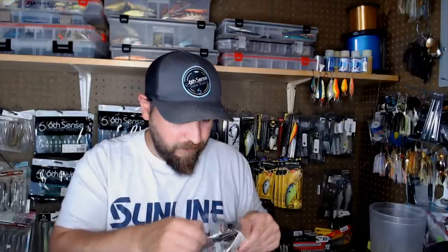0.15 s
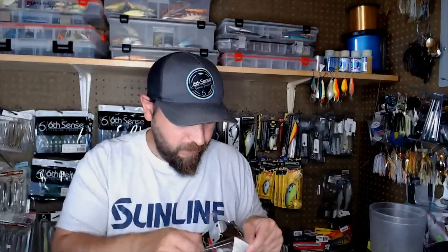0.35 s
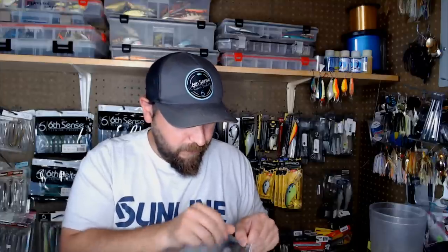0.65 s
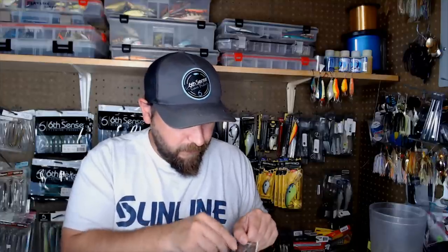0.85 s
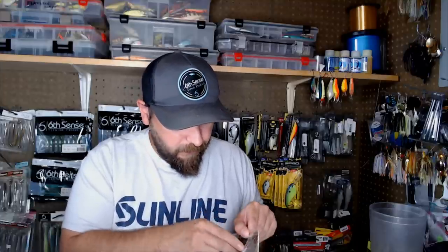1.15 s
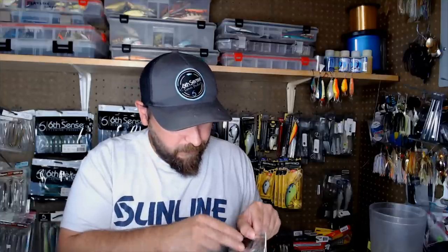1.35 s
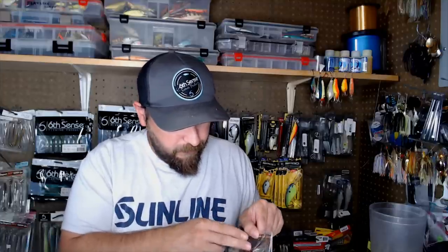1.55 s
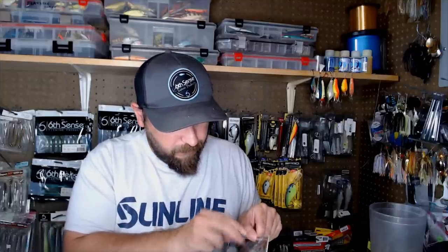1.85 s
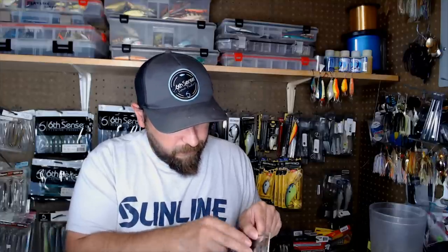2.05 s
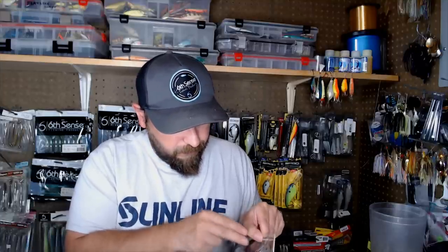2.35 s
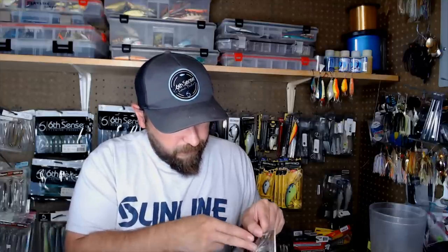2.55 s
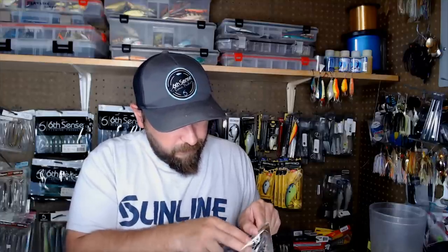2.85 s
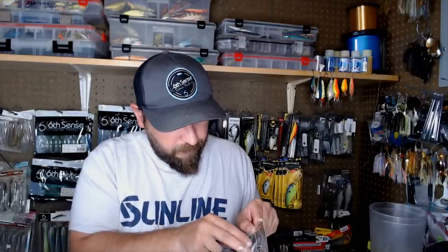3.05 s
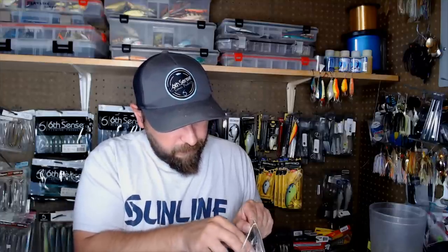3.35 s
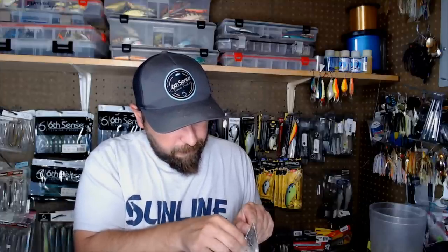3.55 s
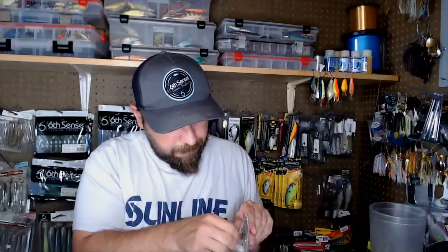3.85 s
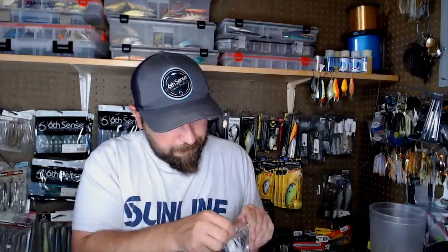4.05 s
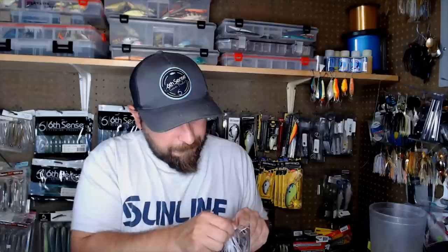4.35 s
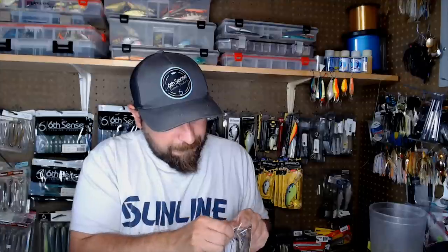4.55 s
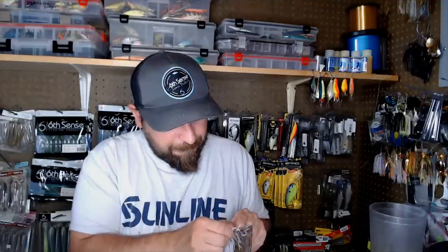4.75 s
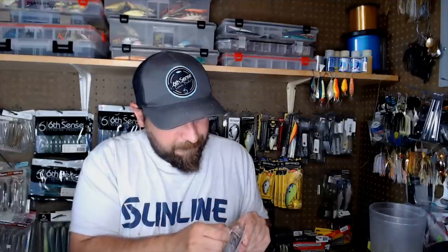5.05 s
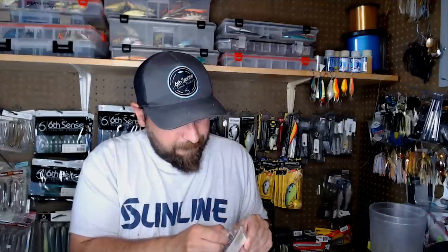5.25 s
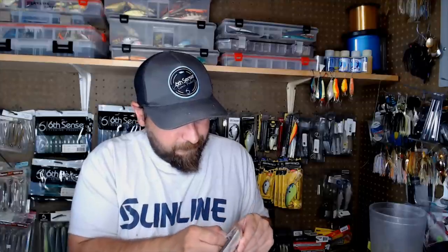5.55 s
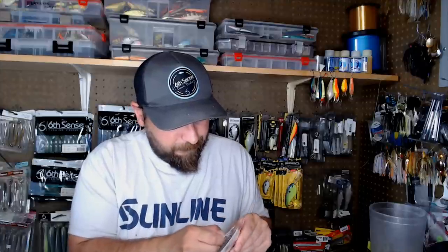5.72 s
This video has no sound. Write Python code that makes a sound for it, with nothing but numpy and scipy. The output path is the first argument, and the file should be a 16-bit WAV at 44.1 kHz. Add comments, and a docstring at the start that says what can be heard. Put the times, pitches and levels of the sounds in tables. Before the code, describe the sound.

Close, dry sound of hands opening a stiff plastic pack at a desk. A dense burst of crisp snaps and rustle comes first, then sparse small clicks, a few livelier clusters, and the loudest crack with a low thump and hollow knock at about 4.4 seconds. Smaller snaps follow and thin out. Small cluttered room, short reflections, faint distant fan.

```python
"""Creases of a stiff clear plastic pack snap through as hands pry it open: bursts of noise, with a ringing panel.
The sheet rustles, mostly under the fingers, as swelling crackle and hiss; metal parts inside scrape as driven modes.
The pack thumps low (damped sines) and knocks hollowly (struck modes); a few faint squeaks glide down.
Echoes of a small cluttered room and a desk top follow as decaying noise; forearms bump the desk as low rumble.
Far off, a fan gives coloured noise and a wavering hum."""
import sys
import numpy as np
from scipy import signal
from scipy.fft import rfft, irfft, next_fast_len
from scipy.io import wavfile

SR = 44100
rng = np.random.default_rng(int(sys.argv[2]) if len(sys.argv) > 2 else 0)


def master_out(mix):
    """Clip the mix to full scale and print it as 16-bit PCM to the path in sys.argv[1]."""
    frames = np.transpose(np.atleast_2d(mix))
    ceiling = np.clip(frames, -1, 1)
    pcm = np.round(ceiling * 32767).astype(np.int16)
    wavfile.write(sys.argv[1], SR, pcm)


N = 259341  # length in samples

# Creases snapping; levels hold before the sheet colours them, crack_db is energy over 1 ms:
# start_s, crack_db, sizzle_above_crack_db, panel_above_crack_db, panel_hz, length_ms
CREASE_SNAPS = [(0.0222, -37, 2, 2.5, 1110.0, 2.7), (0.0515, -37.5, 5.0, 0, 800, 2.4),
                (0.0778, -42.5, 13.5, 4.5, 890.0, 1.9), (0.0839, -33.5, 5.5, -0.5, 885, 2.7),
                (0.1126, -44.5, -3.0, -0.5, 825, 1.8), (0.147, -57, -18, 4, 1430, 4.2),
                (0.195, -38.0, 4.5, 5, 1660, 2.2), (0.218, -45.5, 5, 4.5, 1300, 3.5),
                (0.355, -63.5, 5.5, -2, 1080.0, 1.7), (0.4455, -49.5, -5, 3, 1690, 5.3),
                (0.463, -65, 9, 8.0, 1560, 2.2), (0.4789, -39, 8, -2, 1200, 1.45),
                (0.5148, -46.0, 7, -1, 1820.0, 2.9), (0.5526, -49, -4, -2.0, 1520.0, 6.9),
                (0.5612, -56, 12, -14, 1520.0, 0.47), (0.5678, -50.5, 7, -4, 1260.0, 0.6),
                (0.5729, -48, 2, -11, 1170.0, 1), (0.59, -47.5, 4, 3.0, 1280, 3.5),
                (0.704, -59.5, 13.5, -3.5, 1180.0, 3.3), (0.8023, -57.5, 1, 11.0, 1060.0, 6.3),
                (1.0186, -60.5, 1.5, -5, 1460.0, 3.2), (1.0346, -56.5, 3.5, -7, 1300.0, 3.7),
                (1.056, -57.5, -11, -1.0, 1520, 1.7), (1.1888, -48.5, 6, 6.0, 1100, 8.5),
                (1.4, -50, 1.5, -9, 990, 3.1), (1.423, -55, 8, -15, 1460.0, 1.5),
                (1.4565, -55.0, -8, -5.5, 940.0, 3.5), (1.4662, -51.5, 12.5, -25, 1530.0, 1.9),
                (1.6384, -43.5, 8.5, -6.5, 1760, 1.9), (1.678, -43.0, 0.5, -10.5, 1250, 4.6),
                (1.6964, -53, -2, -5, 1550.0, 1.9), (1.714, -52, 0, -15, 1230.0, 3.1),
                (1.7372, -49.5, 1.0, -5.5, 1220.0, 2.1), (1.7558, -44, 4.5, -12.5, 1620.0, 0.92),
                (1.7688, -52.0, 6, -7.5, 830, 1.8), (1.7878, -41, 2.5, -10, 1530, 5.2),
                (1.9748, -51.5, -2.0, -13.0, 1370, 2.2), (1.9891, -57.5, 7, -3.0, 1300, 1.5),
                (1.994, -59, -10, 6, 850, 4.4), (2.0624, -58.5, 0, -3.5, 940.0, 6.3),
                (2.0862, -59.5, 1.5, -5.0, 1100, 5), (2.2284, -64.5, 1, 11.0, 920, 7.5),
                (2.345, -54.0, 1, 1, 1400, 1.8), (2.4053, -59.5, -3, 7.5, 1210, 6.1),
                (2.459, -42, -3, -3.5, 1120, 3.4), (2.4645, -47.0, 5.5, 2, 650, 2.6),
                (2.4782, -44, 0, 4, 1900, 3), (2.487, -41.5, -7, -4.5, 1900, 8.2),
                (2.5655, -57, 2, -3.0, 1420.0, 4.2), (2.5771, -51, 4, -1.5, 1340.0, 7.3),
                (2.6365, -48, -1, -1.5, 1770, 0.67), (2.6573, -54, 6, -12, 484, 4.7),
                (2.6958, -58, 4, -10, 1410.0, 1.1), (2.7076, -62, 12.5, -12, 1320.0, 3.0),
                (2.727, -49, 1.5, 0, 1750, 1.1), (2.7684, -58, 5, 5, 1700, 1.9),
                (2.8035, -61, 7, 5.5, 1000, 4.5), (2.825, -49.5, 7.5, -9, 1450.0, 7.9),
                (2.9011, -61.0, 2, 5, 930, 4.1), (2.9118, -47.5, 3.0, 1.5, 1710, 1.6),
                (2.9402, -74, 17.5, 5, 1140, 1.6), (2.9817, -71, 17.5, -11, 1040.0, 3.5),
                (3.0305, -57.5, 9.5, 0, 1340.0, 2.9), (3.0798, -59.5, -11, 12.5, 1680, 4.1),
                (3.11, -55.5, 15.5, -1, 1230.0, 2.5), (3.1987, -61, 7, 1, 1310, 4.4),
                (3.2667, -64, 13.5, -4, 1210.0, 0.7), (3.337, -58.0, 2.0, 0, 1570.0, 1.8),
                (3.3912, -61, 12.5, -11, 1070.0, 0.8), (3.417, -37, 11, -11, 1510.0, 1.2),
                (3.4466, -31.5, 6, -3.5, 1760, 1.1), (3.483, -49.0, 5.0, 1, 1050, 4.4),
                (3.4937, -61.0, 21, 3, 407, 4), (3.5121, -50.5, 9, -2, 1400, 4.3),
                (3.5293, -38.5, 4.5, -4, 1750, 1.4), (3.5419, -45, -3, 5.5, 1560, 5.6),
                (3.6274, -59, 3.0, 3, 1150, 3.3), (3.654, -59, 2, 6.5, 1510, 1.4),
                (3.6732, -55, -3, -9, 1230, 1.6), (3.6964, -63, 7, -5, 1330.0, 0.85),
                (3.7078, -54, -2, -2, 830, 2.8), (3.7444, -49.5, 2.5, -4, 1750, 2),
                (3.8026, -46, 5, 8, 1470, 3.4), (3.8222, -49, 9, 1, 1960.0, 1.7),
                (3.8412, -35, 10.5, 6, 1700, 1.3), (3.933, -49.5, 2.5, -5, 1400, 5.6),
                (3.9608, -47, -2, 0, 1330.0, 1.9), (3.9935, -47, 14, 3, 1430, 3),
                (4.0063, -50.5, 7, 5, 1300, 3.6), (4.1227, -54, 5.5, 4, 1850, 0.39),
                (4.1882, -66, 1, 12, 1400, 12), (4.306, -66.5, 13, -1.0, 1060.0, 0.68),
                (4.3446, -46, 4, -7.5, 1060, 2), (4.3804, -42.5, 8.5, -4, 1480.0, 3.2),
                (4.394, -47, 5.0, 13, 1320.0, 3.7), (4.408, -25, 3, 5.5, 1030, 5),
                (4.4522, -35.5, 6.5, -6.5, 846, 5.2), (4.5087, -37.5, 8.5, -12, 1260, 2),
                (4.7166, -49.5, -7, 8.5, 1880, 2.4), (4.7979, -35.0, -5, -0.5, 1270, 2.2),
                (4.8337, -48, 5, 4, 1580.0, 11), (4.8455, -49.5, 12.0, -4, 895, 1.7),
                (4.8763, -56.0, 2, 5.5, 700, 3.2), (4.9103, -63, 7.5, -4, 880.0, 4.6),
                (4.9374, -65, 8.0, 5, 366, 1.7), (4.9453, -54, 6, -8, 357, 15),
                (4.9847, -48.5, 9.5, 4.5, 1560, 1.5), (5.0326, -56, 12.5, 2, 1260, 2),
                (5.0702, -47.5, 7, 8, 1450, 2.9), (5.2832, -34, 0.5, -5.0, 1440, 3.9),
                (5.3289, -39.5, 4.5, -1, 1550, 4.1), (5.3586, -62, 1, -4.0, 1370.0, 7.1),
                (5.4224, -61, 11, -3, 1070.0, 4.6), (5.4717, -63, 20, -1.5, 1000.0, 9.3),
                (5.5605, -56.5, 14, -4, 1260, 3), (5.5967, -66.5, 13, 0.0, 840.0, 5.7),
                (5.6748, -52.5, 6, 4, 1250, 3.5), (5.7117, -63, 10, 10.5, 1560, 8.1),
                (5.728, -56.5, 2, 0, 720, 4.5), (5.7603, -60.5, 2, 4.5, 900, 2.6),
                (5.7752, -64, 1.0, 2, 1190.0, 3.1)]
PANEL_T60_CYCLES = 4.6
# the pack's body against its panel, at a panel pitch of 1 kHz; never louder than the panel
BODY_DB, BODY_DB_PER_OCTAVE = -4.5, -11


def snaps(rise_ms=0.047, fade_exponent=1.03, onset_boost_ms=2.9, onset_fade_ms=0.3):
    """Buckling: a crease lets go as a burst of micro-cracks, and each part of the sheet answers at its own level."""
    start_s, crack_db, sizzle_db, panel_db, panel_hz, length_ms = np.vstack([CREASE_SNAPS, ticks()]).T
    octaves = np.log2(panel_hz / 1000)
    body_db = panel_db + np.minimum(BODY_DB + BODY_DB_PER_OCTAVE * octaves, 0)

    t_ms = np.arange(1536) / SR * 1000
    rise = 1 - np.exp(-t_ms / rise_ms)
    fade = np.exp(-(t_ms / np.clip(length_ms, 0.2, 15)[:, None]) ** fade_exponent)
    # short snaps start hardest
    onset = 1 + onset_boost_ms / length_ms[:, None] * np.exp(-t_ms / onset_fade_ms)
    envelope = rise * fade * onset + 1e-12
    micro_cracks = envelope * rng.standard_normal((len(start_s), len(t_ms)))

    crack = band(micro_cracks, 2350, 5260)
    sizzle = band(band(micro_cracks, 5500, 14800), 5900, 16000)
    panel = np.array([ring(band(burst, 0.42 * hz, 3.1 * hz), hz, PANEL_T60_CYCLES / hz)
                      for burst, hz in zip(micro_cracks, panel_hz)])
    body = band(micro_cracks, 210, 800)

    bursts = 0
    for part, above_db in [(crack, 0), (sizzle, sizzle_db), (panel, panel_db), (body, body_db)]:
        energy = np.sum(part ** 2, axis=1) / SR * 1000
        gain = from_db(crack_db + above_db) / np.sqrt(energy)
        bursts = bursts + part * gain[:, None]

    out = np.zeros(N + len(t_ms))
    first_sample = (start_s * SR).astype(int)
    np.add.at(out, first_sample[:, None] + np.arange(len(t_ms)), bursts)
    return out[:N]


TICKS_PER_S = 8
TICK_DB, TICK_SPREAD_DB, TICK_MS = -67, 5.5, 2.3  # mean and spread of crack level, median length


def ticks():
    """Random release: faint creases let go at chance times, as rows with the columns of the snaps."""
    count = int(TICKS_PER_S * N / SR)
    uniform, normal = rng.random((count, 2)), rng.standard_normal((count, 4))
    start_s = uniform[:, 0] * N / SR
    crack_db = TICK_DB + TICK_SPREAD_DB * normal[:, 0]
    sizzle_db = 2.5 + 6.0 * normal[:, 1]
    panel_db = -5 + 6.0 * normal[:, 2]
    panel_hz = 800 * 2.5 ** uniform[:, 1]
    length_ms = TICK_MS * from_db(4.0 * normal[:, 3])
    return np.c_[start_s, crack_db, sizzle_db, panel_db, panel_hz, length_ms]


# The sheet rustling: finger strokes, and one short burst of crackle (at 3.415 s) just before a snap.
# Levels hold before the sheet colours them; swell and fade are times for 20 dB:
# peak_s, crisp_rustle_db, dull_rustle_above_crisp_db, swell_ms, fade_ms
RUSTLE_SWELLS = [(0.0, -45.5, -7.5, 50, 168), (0.09, -56, 3, 100, 56), (0.219, -55, -1.5, 20, 54),
                 (0.485, -55.5, -7, 74, 141), (0.57, -58, -0.5, 53, 48), (0.702, -70.5, -8, 118, 90),
                 (0.814, -67.5, 6, 33, 51), (1.13, -71.5, -17, 350, 64), (1.198, -56.5, 2, 26, 41),
                 (1.471, -61, -9.5, 211, 51), (1.648, -59, -12, 34, 144), (1.799, -57.5, -6, 107, 25),
                 (1.985, -67.5, -18, 98, 270), (2.236, -75, 8, 20, 30), (2.487, -59.5, -14, 125, 33),
                 (2.578, -65, -4, 59, 598), (2.832, -65, 2, 55, 32), (3.116, -69, -9, 120, 503),
                 (3.415, -55, -7, 5, 10), (3.488, -58, -2, 115, 126), (3.808, -63, 7, 25, 33),
                 (3.85, -57.5, -17, 98, 54), (3.942, -50.5, -1.5, 25, 78), (3.997, -50, -2.5, 45, 41),
                 (4.208, -54, -2.5, 59, 35), (4.346, -55.5, -3.5, 47, 37), (4.412, -41, -3.5, 22, 54),
                 (4.512, -51.5, -14, 16, 23), (4.801, -47.5, -5.5, 2, 26), (4.916, -72.5, -0.5, 394, 73),
                 (5.079, -67.5, -4, 303, 74), (5.291, -50.5, -2, 22, 108), (5.326, -49.5, -2.5, 50, 63),
                 (5.44, -59.5, -4, 62, 88), (5.606, -62.5, -8, 48, 61), (5.724, -68, -6.5, 70, 253)]
# Spectrum of the crisp rustle, relative levels: frequency_hz, level_db (per Hz)
CRISP_SPECTRUM = [(1500, -38), (2200, -2), (4300, -5), (8000, -7), (12000, -5), (17000, -2.5)]
# Frequency ranges of the tiny crackles: low_hz, high_hz
CRACKLE_RANGES = [(300, 2500), (1200, 5000), (2500, 8000), (4000, 12000), (6000, 18000), (2000, 18000)]


def rustle():
    """Granular noise: tiny crackles in several frequency ranges mix with hiss, and swell and fade together."""
    peak_s, crisp_db, dull_db, swell_ms, fade_ms = np.transpose(RUSTLE_SWELLS)
    crackles = 0
    for low_hz, high_hz in CRACKLE_RANGES:
        crackles = crackles + band(grains(300, 5.0), low_hz, high_hz) / np.sqrt(high_hz - low_hz)
    crackles = rms_one(shaped(crackles, [(300, -2.5), (16000, 6)]))
    hiss = 1.16 * rng.standard_normal(N)
    texture = (crackles + hiss) * from_db(2.0 * drift(60))
    crisp = rms_one(shaped(texture, CRISP_SPECTRUM)) * swells(peak_s, crisp_db, swell_ms, fade_ms)
    dull = rms_one(band(texture, 370, 2090)) * swells(peak_s, crisp_db + dull_db, swell_ms, fade_ms)
    return crisp + dull


# Colour the plastic gives to snaps and rustle: frequency_hz, gain_db
SHEET_RESPONSE = [(1500, -2), (3000, 0.5), (4300, 2.5), (5300, 0.5), (6700, 4), (9000, 2), (11000, -6),
                  (13000, -6.5), (15500, -6)]


def sheet_colour(x):
    """Linear filtering: the sheet radiates some frequencies more strongly than others."""
    return shaped(x, SHEET_RESPONSE)


# Metal parts scraping: start_s, length_ms, level_db
METAL_SCRAPES = [(0.001, 14, -63.5), (0.037, 67, -62.5), (0.41, 35, -89), (0.696, 10, -74.5),
                 (1.158, 8.5, -79.5), (2.657, 13, -76), (2.821, 20.5, -73.5), (3.475, 32, -67.5),
                 (5.357, 20, -72), (5.425, 24, -69.5), (5.469, 27, -73.5), (5.6, 14.7, -71.5),
                 (5.712, 18, -93)]
# Modes of the metal parts, levels relative to the scrape: pitch_hz, level_db, t60_s
METAL_MODES = [(4115, 3, 0.029), (5890, 5.5, 0.022), (8050, 10.5, 0.026), (8900, -22, 0.0086),
               (10580, 3.5, 0.019), (12170, 2.5, .018), (14000, 5, .018), (15400, 7, .016)]


def scrapes(end_exponent=14.0, uneven_db=1.5):
    """Slip-driven resonance: dense slips drive the short modes of the metal parts, with changing grip on each."""
    t, push = np.arange(N) / SR, np.zeros(N)
    for start_s, length_ms, level_db in METAL_SCRAPES:
        progress = (t - start_s) * 1000 / length_ms
        hold = (progress > 0) * np.exp(-np.clip(progress, 0, 5) ** end_exponent)  # steady, then a quick end
        push += from_db(level_db) * hold
    out = 0
    for hz, level_db, t60_s in METAL_MODES:
        slips = rms_one(grains(3900, 4.4)) * from_db(uneven_db * drift(65))
        steady_level = np.std(ring(slips, hz, t60_s))
        out = out + from_db(level_db) * ring(slips * push, hz, t60_s) / steady_level
    return out


# The whole pack thumping low; envelope_db is the swing's envelope at its start: start_s, envelope_db, pitch_hz
PACK_THUMPS = [(0.022, -48, 350), (0.0839, -47, 400), (0.4787, -53, 133), (1.677, -60, 252),
               (1.994, -56, 330), (2.459, -41.5, 400), (3.483, -50, 450), (3.71, -61, 473),
               (4.408, -24, 402), (4.407, -52, 120), (4.8765, -52.5, 417), (4.9374, -55.5, 193),
               (5.2832, -48.5, 420), (5.728, -58, 334)]
THUMP_T60_CYCLES = 10.2


def thumps():
    """Damped oscillation: one soft push sets a low swing going, which dies away exponentially."""
    out = np.zeros(N)
    t = np.arange(SR // 8) / SR
    for start_s, envelope_db, hz in PACK_THUMPS:
        envelope = from_db(envelope_db - 60 * t * hz / THUMP_T60_CYCLES)
        first = int(start_s * SR)
        out[first:first + len(t)] += envelope * np.sin(2 * np.pi * hz * t)
    return out


# The pack knocking on something hollow; levels before chance and the final band: start_s, level_db
HOLLOW_KNOCKS = [(0.802, -53), (0.819, -53.5), (1.188, -43), (1.199, -45), (1.204, -60), (2.226, -50.5),
                 (4.408, -31)]
# Modes of the hollow body, levels relative to the knock: pitch_hz, level_db, t60_s
HOLLOW_MODES = [(863, -8.5, 0.052), (987, -11.5, 0.14), (1100, -18.5, 0.058), (1305, -15.5, 0.16),
                (1434, -8.5, 0.075), (2390, -15, 0.078)]


def knocks(uneven_db=4.5):
    """Modal excitation: each knock strikes every hollow mode with a strength and sign of its own."""
    start_s, knock_db = np.transpose(HOLLOW_KNOCKS)
    strength = rng.standard_normal((len(start_s), len(HOLLOW_MODES)))
    sign = np.sign(rng.standard_normal((len(start_s), len(HOLLOW_MODES))))
    out = 0
    for mode, (hz, level_db, t60_s) in enumerate(HOLLOW_MODES):
        clicks = np.zeros(N)
        strike_db = knock_db + level_db + uneven_db * strength[:, mode]
        clicks[(start_s * SR).astype(int)] = from_db(strike_db) * sign[:, mode]
        out = out + ring(clicks, hz, t60_s)
    return band(out, 540, 3900)


# Faint thin squeaks, peak levels: start_s, length_s, start_pitch_hz, end_pitch_hz, level_db
FALLING_SQUEAKS = [(0.61, .085, 15250, 14450, -87), (0.715, .095, 14300, 12700, -90),
                   (0.77, .065, 15550, 14500, -87), (0.83, .04, 12400, 11400, -89)]


def squeaks():
    """Frequency glide: near-pure tones fall in pitch and swell in the middle."""
    t, out = np.arange(N) / SR, 0
    for start_s, length_s, start_hz, end_hz, level_db in FALLING_SQUEAKS:
        progress = np.clip((t - start_s) / length_s, 0, 1)
        pitch_hz = start_hz + (end_hz - start_hz) * progress
        phase = 2 * np.pi * np.cumsum(pitch_hz) / SR
        swell = np.sqrt(np.sin(np.pi * progress) + 1e-12)
        out = out + from_db(level_db) * swell * np.sin(phase)
    return out


ROOM_T60_S, ROOM_DB, ROOM_LOW_HZ, ROOM_HIGH_HZ = 0.19, -13, 199.5, 12300
DESK_T60_S, DESK_DB, DESK_LOW_HZ, DESK_HIGH_HZ = 0.16, -14.5, 800, 1500


def room(x):
    """Reverberation: diffuse reflections from shelves and walls, and the hollow ring of the desk top."""
    walls = from_db(ROOM_DB) * tail(x, ROOM_T60_S, ROOM_LOW_HZ, ROOM_HIGH_HZ)
    desk = from_db(DESK_DB) * tail(x, DESK_T60_S, DESK_LOW_HZ, DESK_HIGH_HZ)
    return walls + desk


ECHO_GAP_S = 0.00072  # silence before the first reflection


def tail(x, t60_s, low_hz, high_hz):
    """Exponential decay: convolution with fading noise puts a band-limited tail behind every sound."""
    t = np.arange(SR // 2) / SR
    decay = from_db(-60 * t / t60_s)
    echo = band(rng.standard_normal(len(t)) * decay * (t > ECHO_GAP_S), low_hz, high_hz)
    return signal.fftconvolve(x, echo / np.sqrt(np.sum(decay ** 2)))[:N]


# Forearms bumping the desk; fade is the time for 20 dB: peak_s, level_db, fade_ms
DESK_BUMPS = [(0.0, -56.5, 130), (0.56, -73, 160), (0.83, -78, 400), (1.21, -65.5, 110), (2.42, -73, 190),
              (3.96, -71, 177), (4.24, -62.5, 116), (4.418, -57, 320), (4.749, -75, 599), (5.36, -65, 177),
              (5.52, -70, 176)]
BUMP_SWELL_MS, RESTING_DB = 47, -81.5  # rise time for 20 dB, steady rumble under the bumps


def rumble():
    """Structure-borne sound: forearms working on the desk shake the microphone through its stand."""
    peak_s, level_db, fade_ms = np.transpose(DESK_BUMPS)
    swell_ms = np.full(len(peak_s), BUMP_SWELL_MS)
    shaking = from_db(RESTING_DB) + swells(peak_s, level_db, swell_ms, fade_ms)
    return shaking * rms_one(band(rng.standard_normal(N), 3.0, 53.4))


# Spectrum of the room tone, relative levels: frequency_hz, level_db (per Hz)
AIR_SPECTRUM = [(30, -19), (60, -30), (95, 2.5), (140, -2), (360, -5.5), (750, -6.5), (1280, 2.5),
                (1950, -7.5), (3500, -11), (4200, -12.5), (8400, -18), (15500, -21), (17000, -41)]
AIR_DB = -74  # before its slow drift
HUM_HZ, HUM_WAVER_HZ, HUM_DB = 93, 2.9, -79.5  # mean pitch, its rms waver, amplitude before its drift


def room_tone():
    """Broadband and tonal fan noise: coloured far-off air noise with a low hum that wavers in pitch and level."""
    pitch_hz = HUM_HZ + HUM_WAVER_HZ * drift(3.6)
    hum = np.sin(2 * np.pi * np.cumsum(pitch_hz) / SR) * from_db(1.6 * drift(7.6))
    air = rms_one(shaped(rng.standard_normal(N), AIR_SPECTRUM)) * from_db(0.66 * drift(2.74))
    return from_db(AIR_DB) * air + from_db(HUM_DB) * hum


def from_db(db):
    """Decibel law: level in dB to amplitude gain."""
    return 10 ** (np.asarray(db) / 20)


def rms_one(x):
    """Normalisation: scale to an rms of 1."""
    return x / np.sqrt(np.mean(x ** 2) + 1e-20)


def band(x, low_hz, high_hz):
    """Band-pass filtering: keep the range between two frequencies."""
    return signal.sosfilt(signal.butter(2, [low_hz, high_hz], "band", fs=SR, output="sos"), x)


def shaped(x, points):
    """Spectral shaping: filter by a curve of (Hz, dB) points, straight over log frequency."""
    size = next_fast_len(N)
    hz = np.maximum(np.arange(size // 2 + 1) * SR / size, 1)
    point_hz, point_db = np.array(points).T
    gain_db = np.interp(np.log(hz), np.log(point_hz), point_db)
    return irfft(rfft(x, size) * from_db(gain_db), size)[:N]


def drift(rate_hz):
    """Low-passed noise: a slow random wander of rms 1."""
    pole = np.exp(-2 * np.pi * rate_hz / SR)
    noise = rng.standard_normal(N + SR)
    settled = signal.lfilter([1], [1, -2 * pole, pole * pole], noise)[SR:]
    return rms_one(settled)


def ring(x, hz, t60_s):
    """Two-pole resonance: a unit click sets a decaying sine of height 1 ringing."""
    radius, angle = from_db(-60 / (t60_s * SR)), 2 * np.pi * hz / SR
    feedback = [1, -2 * radius * np.cos(angle), radius * radius]
    return signal.lfilter([0, np.sin(angle)], feedback, x + 1e-18)


def grains(per_s, spread_db):
    """Random impulses: clicks at chance times, with a long tail of sizes."""
    size_db = spread_db * np.minimum(rng.exponential(1, N), 4)
    sizes = from_db(size_db) * rng.choice([-1, 1], N)
    return sizes * (rng.random(N) < per_s / SR)


def swells(peak_s, level_db, swell_ms, fade_ms):
    """Power addition: gain of events that rise to a peak and fade, each straight in dB."""
    step = 32  # samples between computed gains
    late_ms = (np.arange(0, N + step, step) / SR - np.c_[peak_s]) * 1000
    drop_db = 20 * np.maximum(-late_ms / np.c_[swell_ms], late_ms / np.c_[fade_ms])
    gain = np.sqrt(np.sum(from_db(np.c_[level_db] - drop_db) ** 2, axis=0))
    return np.interp(np.arange(N) / step, np.arange(len(gain)), gain)


def scene():
    """Superposition: the pack, its reflections, the knocks and the background add up."""
    pack = sheet_colour(snaps() + rustle()) + scrapes() + squeaks() + thumps()
    return (pack + room(pack) + knocks() + rumble() + room_tone())[None]


def record(dry):
    """Low-pass filtering: a steep cut leaves everything above 16.8 kHz at least 60 dB down."""
    return signal.sosfilt(signal.cheby2(14, 60, 16800, fs=SR, output="sos"), dry)


dry = scene()
out = record(dry)
master_out(out)
```